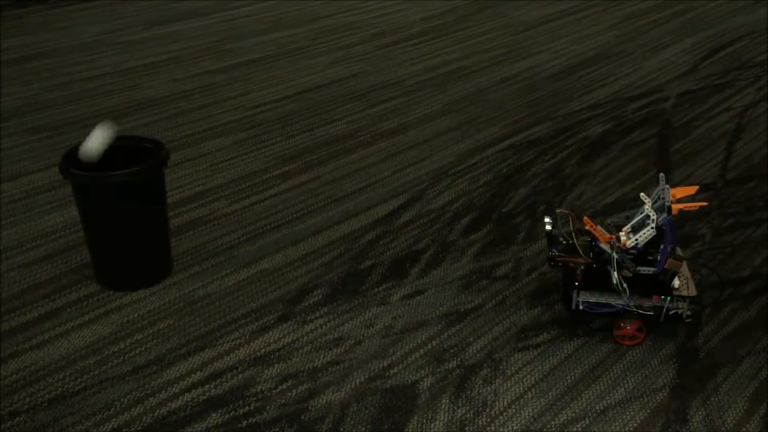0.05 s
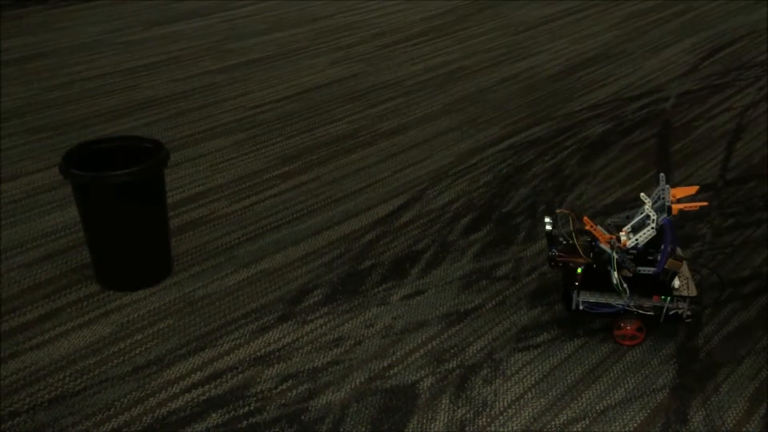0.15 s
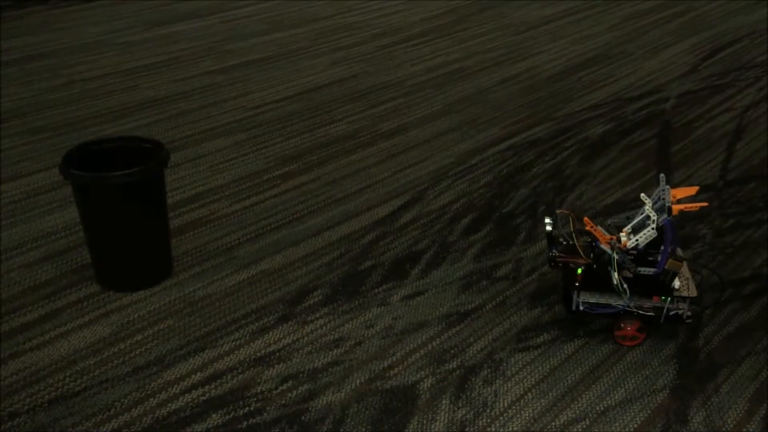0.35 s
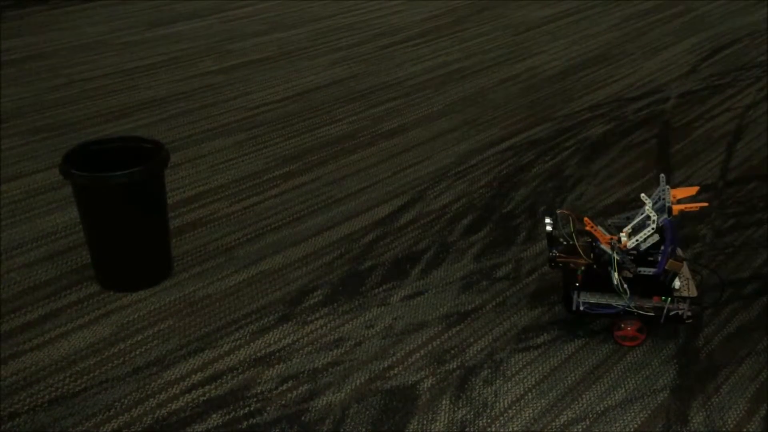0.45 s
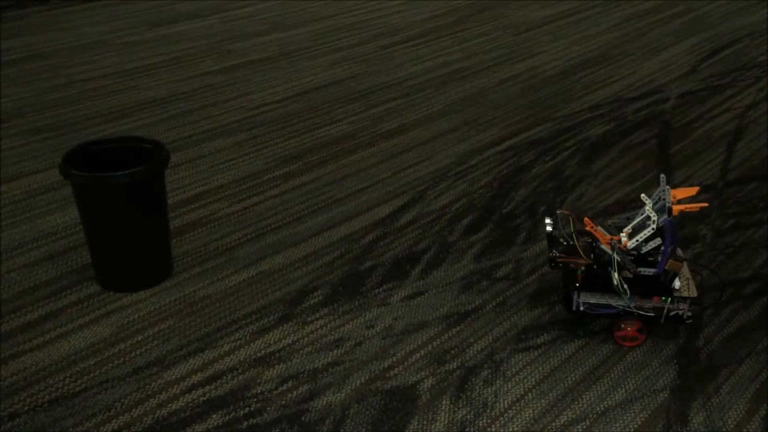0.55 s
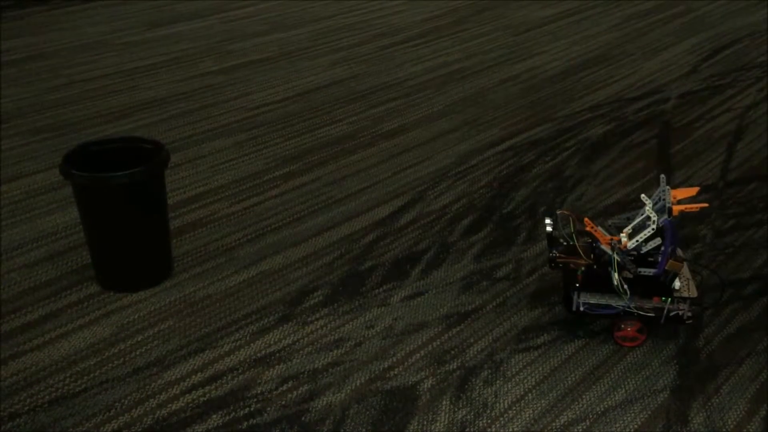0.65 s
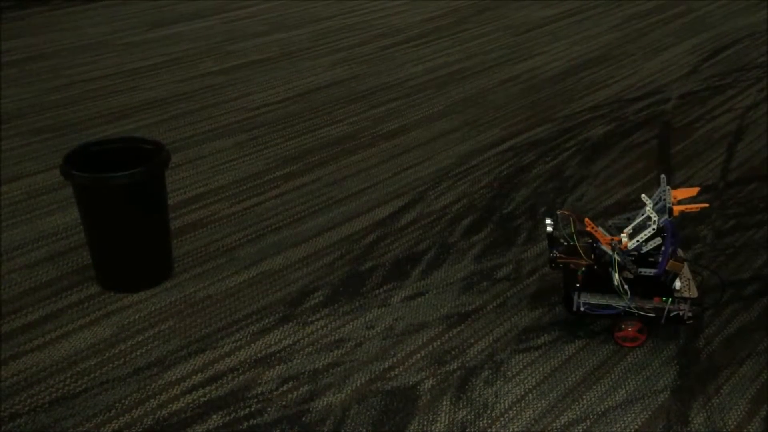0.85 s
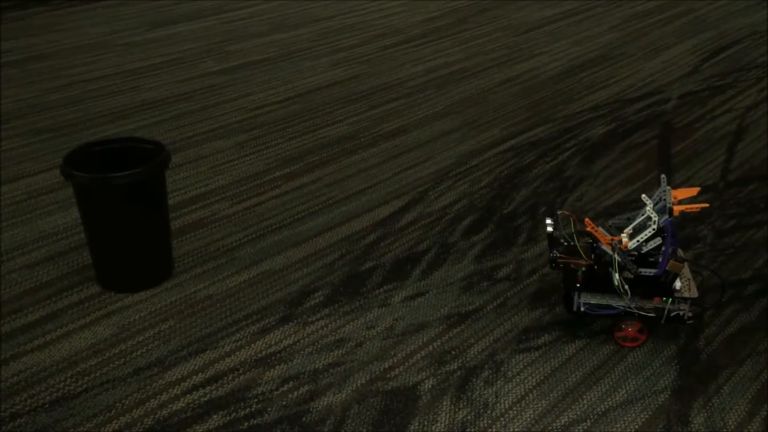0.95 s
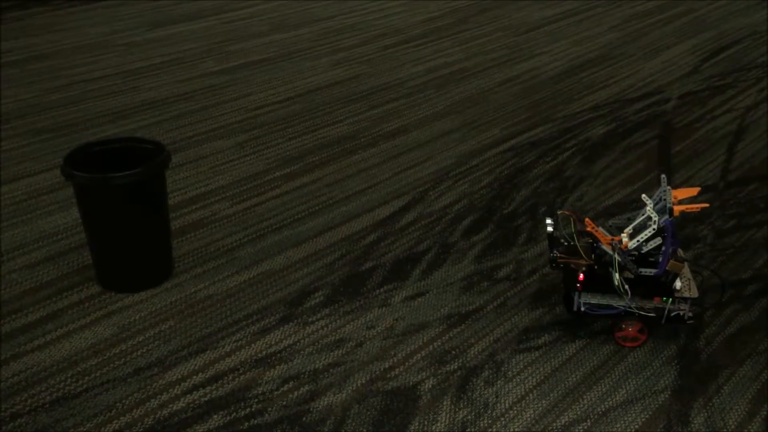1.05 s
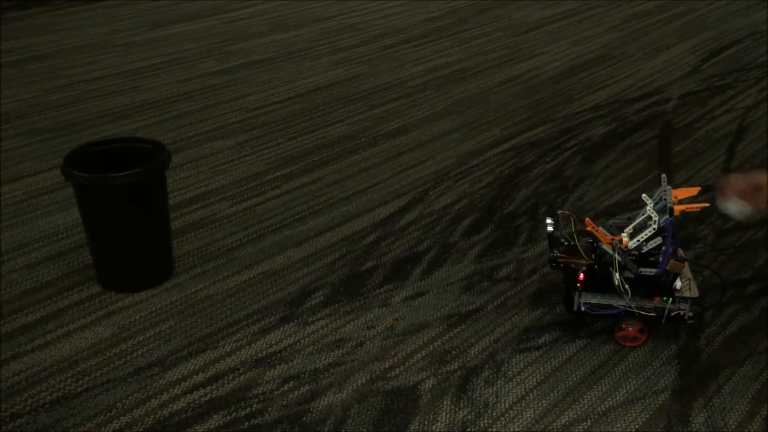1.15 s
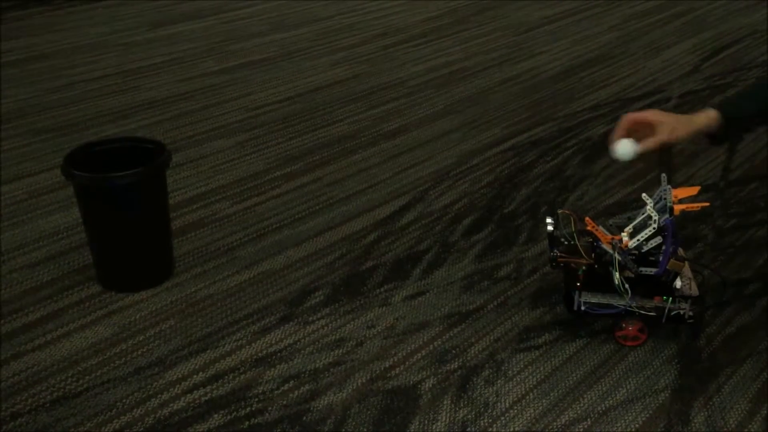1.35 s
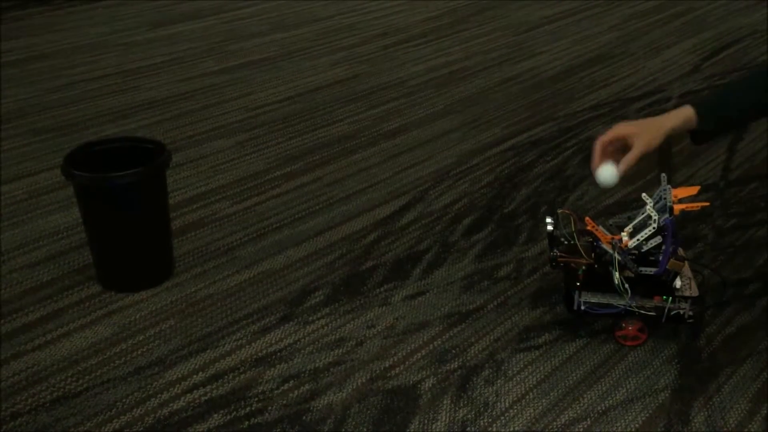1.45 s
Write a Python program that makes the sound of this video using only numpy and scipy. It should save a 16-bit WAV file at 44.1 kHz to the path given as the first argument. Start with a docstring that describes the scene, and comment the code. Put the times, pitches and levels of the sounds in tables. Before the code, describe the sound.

A light ball bounces around in a plastic bin over a faint motor whine.

```python
"""From the start, ventilation rumbles in a quiet, carpeted room and a small launcher's motor whines faintly.
At 0.2 s a small hollow ball clips the rim of a plastic bin. It drops in and rattles between wall and
bottom, and the air in the bin booms under each clack. Meanwhile the motor winds down.
Just after 1 s the ball rolls to rest, and the ventilation rumbles on."""
import sys
import numpy as np
from scipy import signal
from scipy.fft import rfft, irfft, next_fast_len
from scipy.io import wavfile
from scipy.ndimage import map_coordinates

SR = 44100
rng = np.random.default_rng(int(sys.argv[2]) if len(sys.argv) > 2 else 0)


def put_to_file(sound):
    """Save the sound as 16-bit audio at rate SR, in the file named by the first command-line argument."""
    columns = np.atleast_2d(sound).T  # one column per channel
    safe = np.clip(columns, -1, 1)
    whole_steps = np.round(safe * 32767)
    wavfile.write(sys.argv[1], SR, whole_steps.astype(np.int16))


N = 66150
T = np.arange(N) / SR


def amp(db):
    """Turn decibels into a number to multiply by."""
    return 10 ** (np.asarray(db) / 20)


def unit(x):
    """Scale a signal so that its average power is 1."""
    return x / np.sqrt(np.mean(x ** 2) + 1e-20)


def along(points, hz):
    """Read between (Hz, value) points, giving each octave about equal room."""
    point_hz, values = np.transpose(points)
    return np.interp(np.log(hz + 1), np.log(point_hz + 1), values)


def filtered(x, response):
    """Multiply each frequency in x by response(hz)."""
    size = next_fast_len(N + SR // 2)
    hz = np.fft.rfftfreq(size, 1 / SR)
    return irfft(rfft(x, size) * response(hz), size)[:N]


def noise(spectrum):
    """Steady noise with the given balance of low and high sound."""
    return unit(filtered(rng.standard_normal(N), lambda hz: amp(along(spectrum, hz))))


def wobble(rate):
    """A smooth curve through `rate` random values a second."""
    return map_coordinates(rng.standard_normal(256), [T * rate], mode="wrap")


def fade(t60, rise, t=T):
    """A struck thing swells quickly, then dies away; the fade time t60 is the seconds to fall 60 dB."""
    return np.exp(-np.log(1000) * t / t60) * (1 - np.exp(-t / rise))


def delayed(x, s):
    """Start x later by s seconds."""
    return np.pad(x, (round(s * SR), N))[:N]


def ring(modes, detune=0):
    """One row of sound for each fading note; every second one is flipped, and detune scatters pitch."""
    t = T[:SR // 4]
    rows = []
    for k, (hz, db, t60, rise) in enumerate(modes):
        pitch = hz * (1 + detune * rng.standard_normal())
        rows.append((-1) ** k * amp(db) * fade(t60, rise, t) * np.sin(2 * np.pi * pitch * t))
    return np.array(rows)


def brightness(db, hz, from_hz=1400, full_hz=4440):
    """Turn the treble up or down by db, for a brighter or duller sound."""
    return amp(db * along([(from_hz, 0), (full_hz, 1)], hz))


def burst(spectrum, t60, rise, bright_db=0):
    """Many close notes dying quickly, made as a puff of noise."""
    t = T[:SR // 4]
    hz = np.fft.rfftfreq(len(t), 1 / SR)
    colour = unit(amp(along(spectrum, hz))) * brightness(bright_db, hz)
    hiss = irfft(rfft(rng.standard_normal(len(t))) * colour, len(t))
    return fade(t60, rise, t) * hiss


def ventilation(fan_hz=74.3, fan_db=-47.5, rumble_db=-40):
    """Low rumble and faint hiss surround a fan note whose pitch drifts a little."""
    # Each row: frequency in Hz, relative noise level in dB.
    rumble_colour = [(20, -18), (45, -8.5), (75, 0), (105, -4), (140, -15.5), (210, -16.5), (300, -27),
                     (400, -34), (700, -42), (1500, -47), (4000, -55), (9000, -60.5), (15500, -66.5)]
    phase = 2 * np.pi * fan_hz * T + 0.5 * wobble(7)
    fan = np.sqrt(2) * amp(fan_db) * np.sin(phase)
    return fan + amp(rumble_db) * noise(rumble_colour)


def motor(flutter_db=4.5):
    """Thin, fluttering tones follow the motor's shaft as it wavers and slows."""
    # Each row: time in seconds, shaft turns per second.
    speed = [(0, 201), (.05, 202.2), (.1, 201.2), (.17, 202.7), (.23, 201.8), (.29, 203), (.34, 201.6),
             (.42, 204.1), (.48, 203.3), (.54, 200.6), (.66, 192.5)]
    # Each row: time in seconds, change in the whine's level in dB.
    loudness = [(0, -1), (.2, 1), (.32, 0), (.6, 1.5), (.66, -4), (.74, -35)]
    # For each tone: its vibrations per shaft turn.
    multiples = [8, 10, 11, 20, 22, 71, 72, 74, 75, 76, 77, 78, 79]
    # For each tone: its base level in dB.
    levels = [-77, -67.5, -66, -85.5, -73.5, -89, -85.5, -76, -76.5, -85.5, -77, -73.5, -80]
    turns = np.cumsum(np.interp(T, *np.transpose(speed))) / SR
    whine = np.zeros(N)
    for multiple, db in zip(multiples, levels):
        strength = amp(db + flutter_db * wobble(23))
        whine += strength * np.sin(2 * np.pi * (multiple * turns + rng.random()))
    return np.sqrt(2) * whine * amp(np.interp(T, *np.transpose(loudness)))


def rim(start_s=0.2117, gain_db=-18, rise_s=0.001):
    """The ball clips the rim: a bright clack that hardly stirs the air inside."""
    # The rim's notes. Each row: pitch in Hz, relative level in dB, fade time in seconds.
    rim_notes = [(337.7, -15.5, .11), (657, -5, 0.072), (900, -1.5, .02), (1260, -8.5, .025),
                 (1410, -13, 0.12), (2011, -5, 0.013), (2450, -17.5, 0.12), (2900, -21, .02),
                 (3390, -14.5, .02), (3630, -14, .035), (4760, -13.5, 0.023), (6170, -12, 0.016)]
    # Each row: frequency in Hz, relative noise level in dB.
    crack_colour = [(300, -19), (800, 1), (2500, -0.5), (4000, -3.5), (6200, -14.5), (7500, -21),
                    (9500, -22), (13000, -12), (16000, -27.5)]
    ringing = ring([(hz, db, t60, rise_s) for hz, db, t60 in rim_notes]).sum(axis=0)
    crack = burst(crack_colour, t60=0.021, rise=rise_s)
    return delayed(amp(gain_db) * (ringing + crack), start_s)


def bounces(rise_s=0.00053):
    """Each hit in the bin rings the plastic, the air and the ball, with its own loudness and brightness."""
    # Each row: start in seconds, then dB changes for the whole hit, boom, knock, treble and ball shell.
    hits = [(.2994, -18, 11, 5, -6, 4.5), (0.3275, -28, 3, -6, -8, 0), (0.3946, -38.5, 10, -2.5, -5, 11),
            (.4230, -22, 9, -0.5, -12, -7), (0.4279, -33, -2, -11, 4.5, 5),
            (0.4545, -32, -1, 2.5, -15, -8.5), (0.4982, -36.5, -2, -9.5, 1.5, 0),
            (0.5119, -39, -7, -3, 0, -7), (0.5701, -36, 0, -5.5, -7, 5), (0.584, -42.5, 5.5, 3, -8, -5),
            (0.6336, -10.5, -0.5, 1, 3, -0.5), (0.6619, -39, -4, -7, -26.5, -2),
            (0.6748, -32.5, -4, 0.5, -4, -3), (0.6995, -36, -6, 1.5, -4, -9),
            (.7860, -25.5, 7, -1.5, -20, -3), (.8175, -37, -8, 1, -5, -8),
            (0.8218, -25.5, -1, -26, -13.5, -10), (0.8562, -17, 2.5, -1, -2.5, -8),
            (0.9388, -22, 3.5, -1.5, -6, -13), (0.9806, -30, 7, 0, -5.5, -16),
            (1.0031, -32, 4.5, -9, -13, -12), (1.014, -35.5, -3, -3.5, -23, -8),
            (1.189, -45.5, -2, -7.5, 1.5, -1)]
    # The low boom and the hollow knock of the air in the bin, and the notes of the plastic wall.
    # Each row: pitch in Hz, relative level in dB, fade time in seconds, rise time in seconds.
    boom_notes = [(334.6, -4.5, 0.11, 0.0019), (255, -8, .03, 0.0019), (384, -12, 0.031, .0012)]
    knock_notes = [(956.4, 11, 0.021, 0.0036), (1097, -5, 0.025, 0.00054)]
    wall_notes = [(570, -15.5, 0.03, 0.00022), (691, -11.5, 0.041, .0005), (1380, -15.5, 0.036, 0.00041),
                  (1615, -12, .022, 0.00076), (1983, -6, 0.014, .0003), (2526, -6, 0.013, .0003),
                  (2855, -13.5, 0.017, .0002), (3485, -10.5, 0.016, 0.0001956), (4370, -17, 0.013, .0002),
                  (5200, -16.5, .009, .0002)]
    # The wall's low thud, the crack of contact and the ring of the ball's own shell.
    # Each row: frequency in Hz, relative noise level in dB.
    thud_colour = [(100, -19), (180, -2), (300, -5.5), (500, 0), (760, -2.5), (1100, 1.5), (1600, -1),
                   (2400, -12), (5000, -44.5)]
    crack_colour = [(200, -19.5), (600, -3), (1200, -7), (2500, -2.5), (3500, -4), (4400, -10.5),
                    (6300, -18), (7500, -33), (16000, -38.5)]
    shell_colour = [(5000, -21.5), (7700, -12.5), (8800, 0.5), (9400, -8.5), (11500, -5), (13300, -12),
                    (16000, -11.5)]
    boom = ring(boom_notes).sum(axis=0)
    wall_hz = np.array(wall_notes)[:, 0]
    rattle = np.zeros(N)
    for start_s, db, boom_db, knock_db, bright_db, shell_db in hits:
        knock = amp(knock_db) * ring(knock_notes, detune=0.008).sum(axis=0)
        wall = brightness(bright_db, wall_hz) @ ring(wall_notes, detune=0.029)
        thud = amp(-6) * burst(thud_colour, t60=0.043, rise=rise_s)
        crack = amp(-4.5) * burst(crack_colour, t60=0.013, rise=rise_s, bright_db=bright_db)
        shell = amp(shell_db - 22.5) * burst(shell_colour, t60=0.022, rise=rise_s)
        clack = amp(boom_db) * boom + knock + wall + thud + crack + shell
        rattle += delayed(amp(db) * clack, start_s)
    return rattle


def roll(start_s=1.048, end_s=1.225, edge_s=0.041, level_db=-60, rough_db=2):
    """The ball rolls across the bottom until it meets the wall."""
    # Each row: frequency in Hz, relative noise level in dB.
    roll_colour = [(300, -1), (700, -11), (1000, -10), (1450, 5), (2100, -21), (3200, -20), (4500, -17),
                   (7000, -41)]
    fade_in_out = np.clip(np.minimum(T - start_s, end_s - T) / edge_s, 0, 1)
    return fade_in_out * amp(level_db + rough_db * wobble(74)) * noise(roll_colour)


def room(x, delay_s=0.007):
    """The room answers a sound with a few near echoes, a quick scatter and a soft tail."""
    # Each row: frequency in Hz, the tail's fade time in seconds.
    fade_times = [(150, 0.4), (350, 0.92), (1000, 0.41), (3000, 0.51), (8000, 0.2), (15000, 2.5)]
    # Each row: frequency in Hz, the tail's relative level in dB.
    tail_colour = [(150, -10.5), (330, -13), (1000, -16), (2500, -15.5), (6000, -23), (14000, -15)]
    # Echoes off near surfaces. Each row: delay in seconds, relative level in dB.
    echoes = [(.0149, -22.5), (0.019, -21.5), (.031, -24)]
    hz, t, bands = signal.stft(rng.standard_normal(N), SR, nperseg=256)
    t60 = along(fade_times, hz)[:, None]
    # The square root keeps slow-fading bands from carrying more energy.
    gain = amp(along(tail_colour, hz))[:, None] * np.sqrt(2 * np.log(1000) / (t60 * SR))
    fading_bands = bands * gain * np.exp(-np.log(1000) * t / t60)
    tail = signal.istft(fading_bands, SR, nperseg=256)[1][:N]
    puff = rng.standard_normal(N) * fade(t60=0.089, rise=0.001)
    scatter = amp(-19.5) * unit(puff) / np.sqrt(N)
    reverb = signal.fftconvolve(x, delayed(tail + scatter, delay_s))[:N]
    return reverb + sum(amp(db) * delayed(x, s) for s, db in echoes)


def scene():
    """The ball and its echoes sound over the ventilation and the motor, in one channel."""
    ball = rim() + bounces() + roll()
    return (ventilation() + motor() + ball + room(ball))[None]


def record(dry):
    """Cut away the very highest treble."""
    top_hz = 15780
    return np.array([filtered(channel, lambda hz: hz < top_hz) for channel in dry])


dry = scene()
out = record(dry)
put_to_file(out)
```